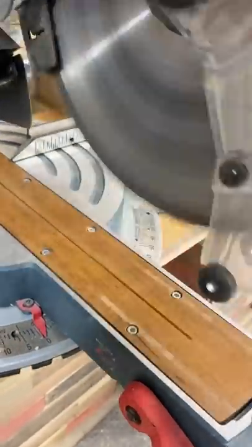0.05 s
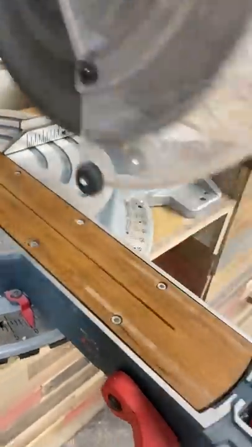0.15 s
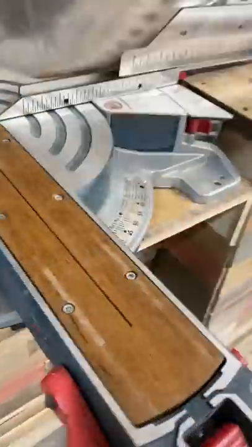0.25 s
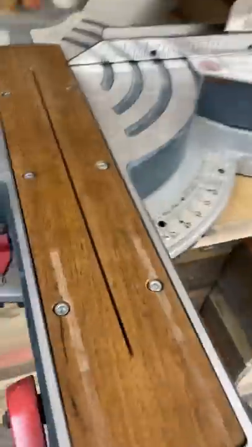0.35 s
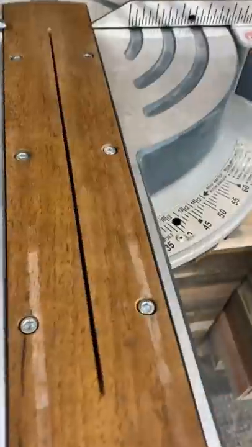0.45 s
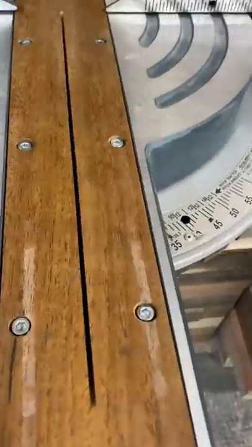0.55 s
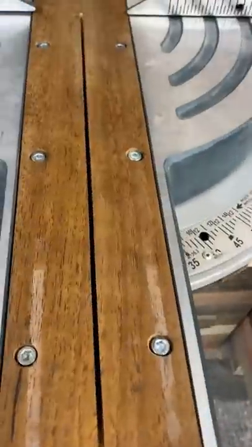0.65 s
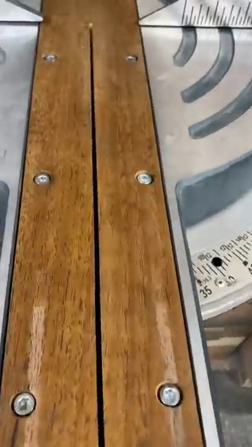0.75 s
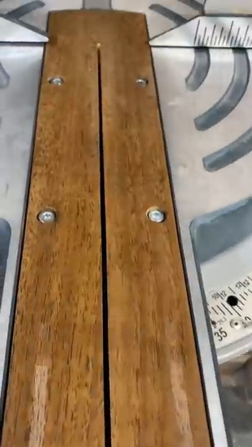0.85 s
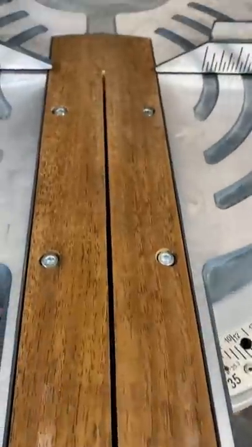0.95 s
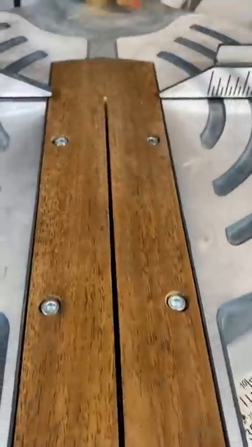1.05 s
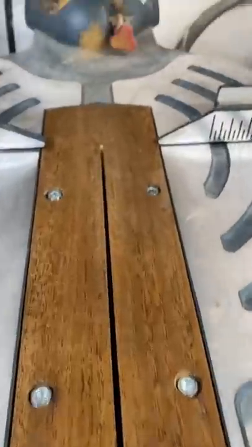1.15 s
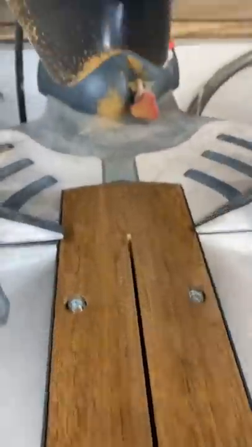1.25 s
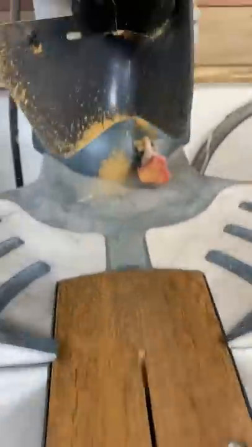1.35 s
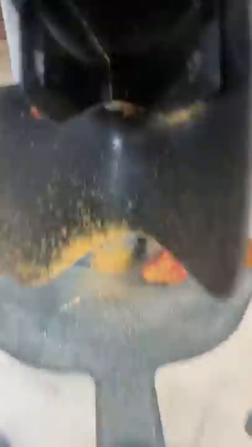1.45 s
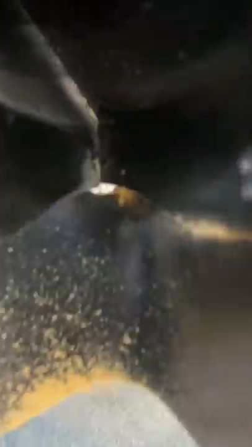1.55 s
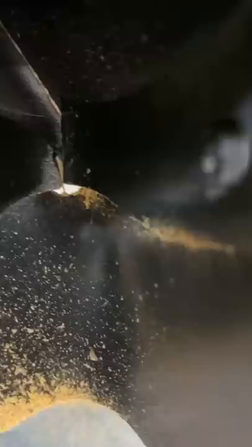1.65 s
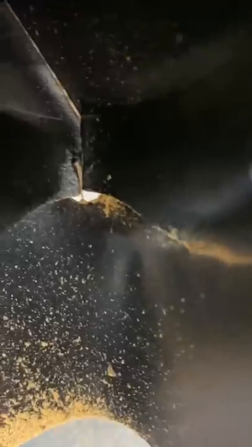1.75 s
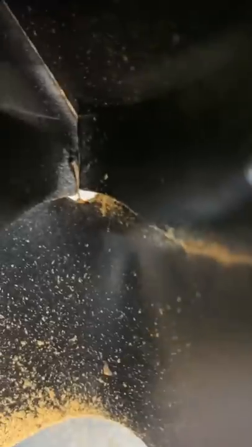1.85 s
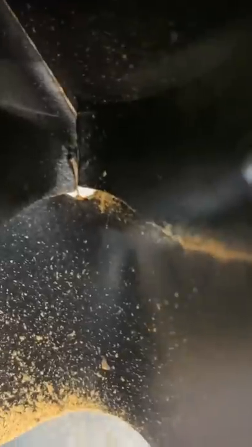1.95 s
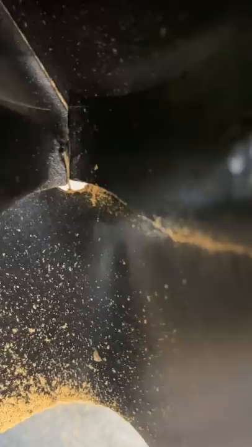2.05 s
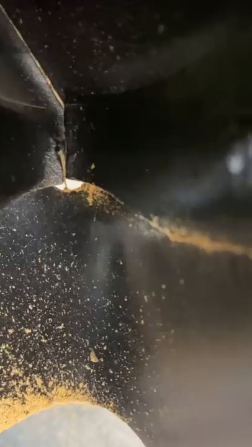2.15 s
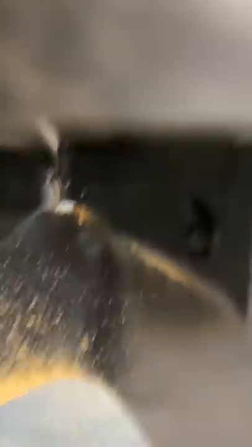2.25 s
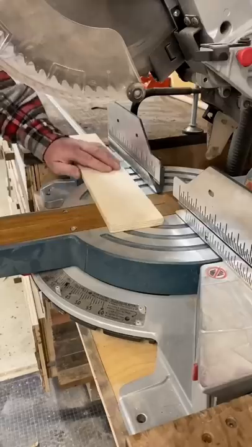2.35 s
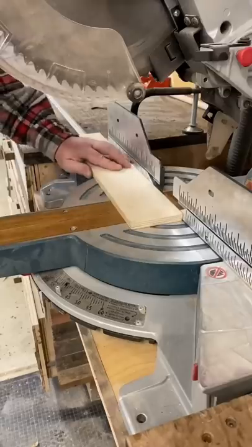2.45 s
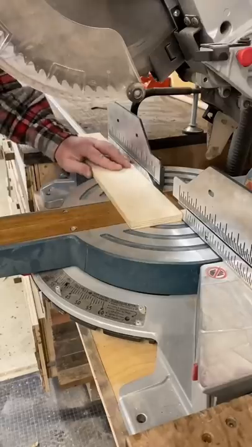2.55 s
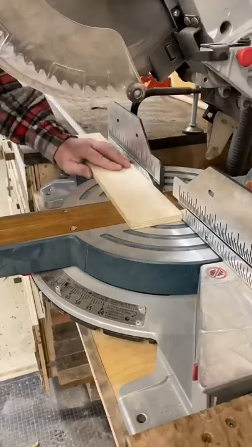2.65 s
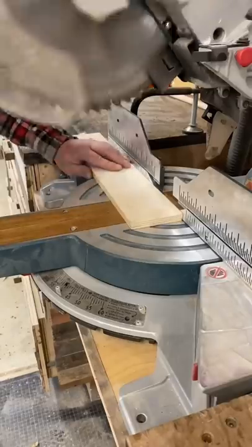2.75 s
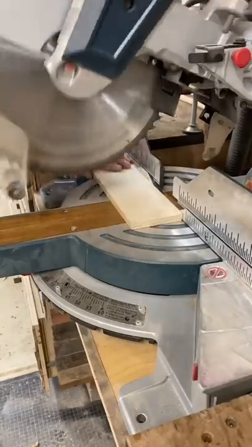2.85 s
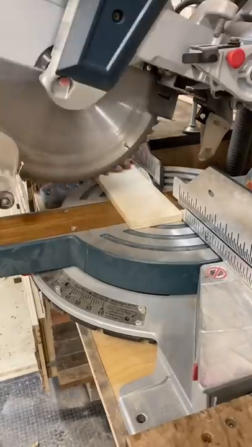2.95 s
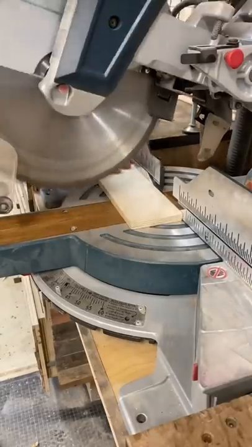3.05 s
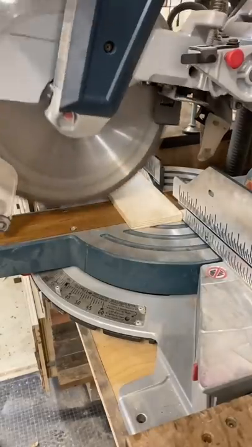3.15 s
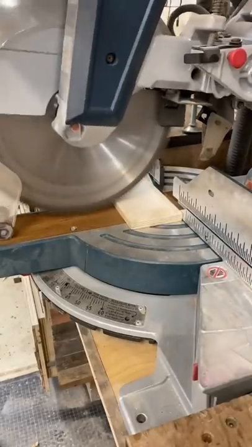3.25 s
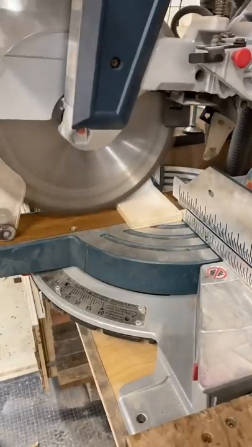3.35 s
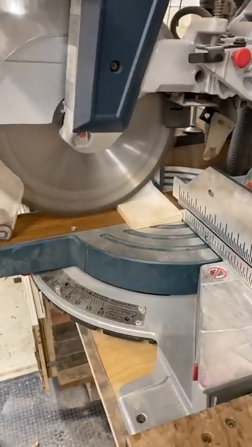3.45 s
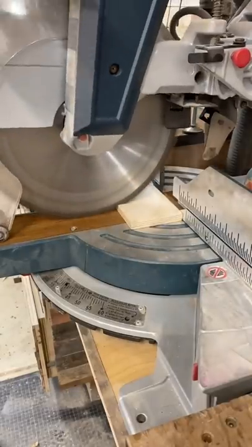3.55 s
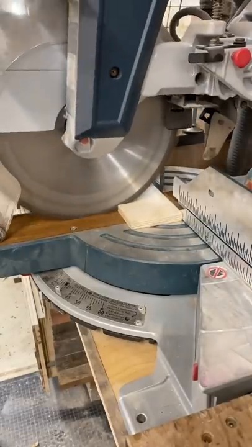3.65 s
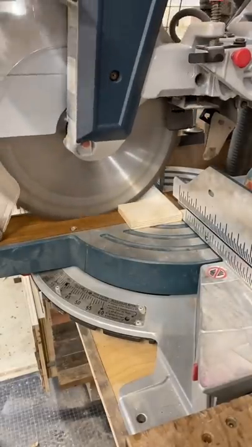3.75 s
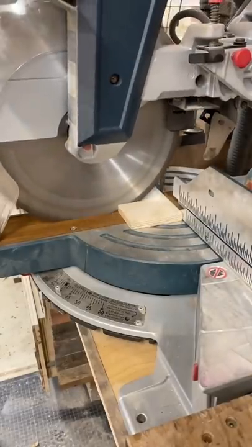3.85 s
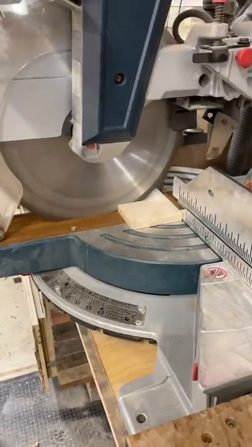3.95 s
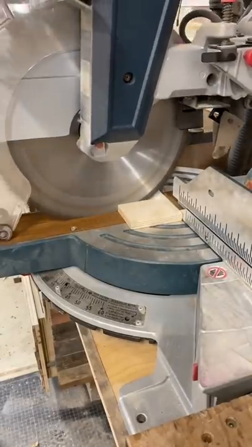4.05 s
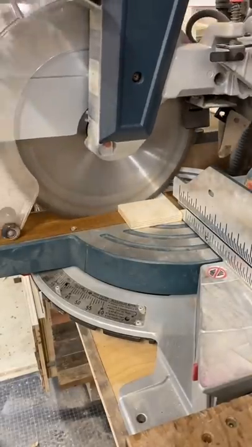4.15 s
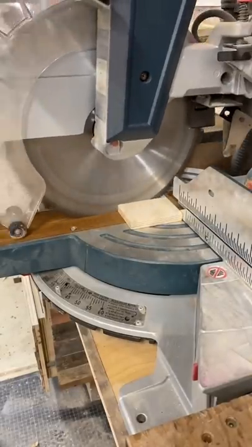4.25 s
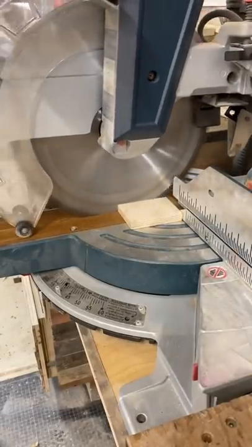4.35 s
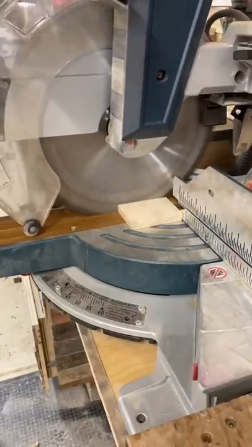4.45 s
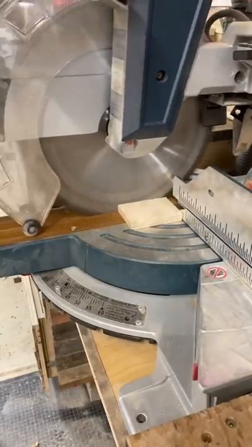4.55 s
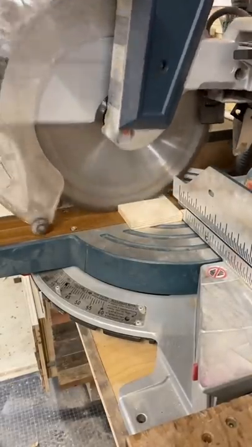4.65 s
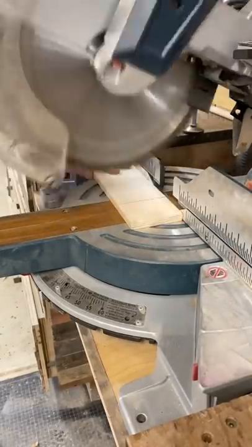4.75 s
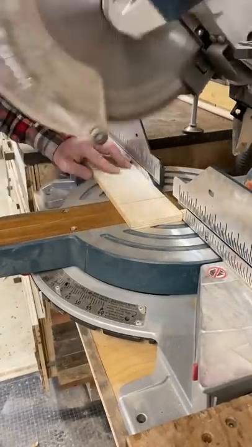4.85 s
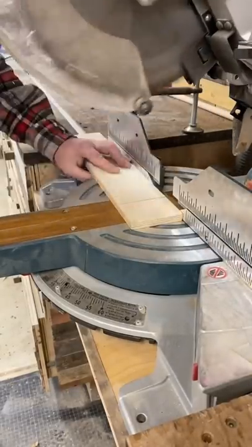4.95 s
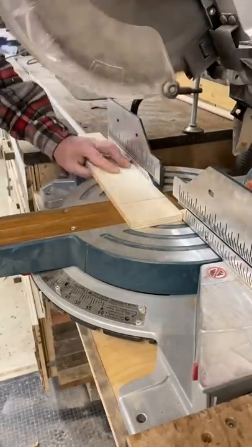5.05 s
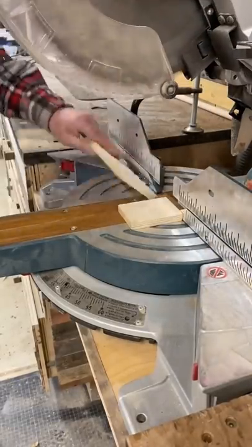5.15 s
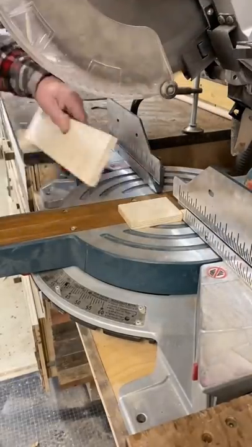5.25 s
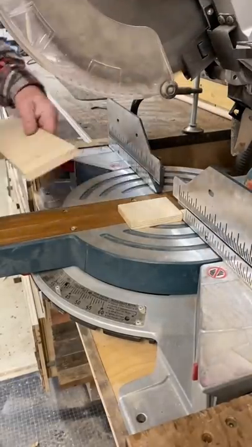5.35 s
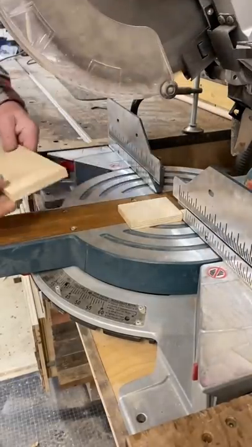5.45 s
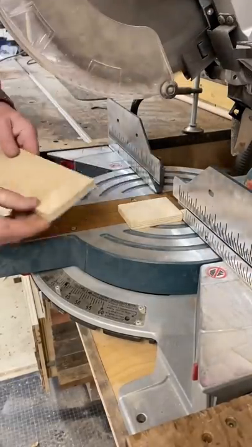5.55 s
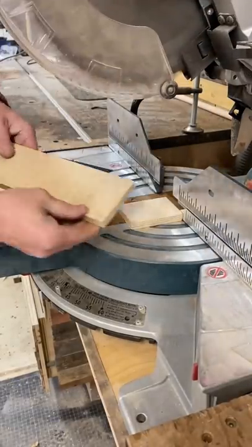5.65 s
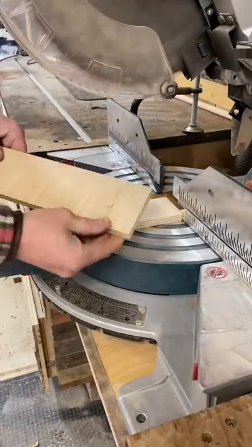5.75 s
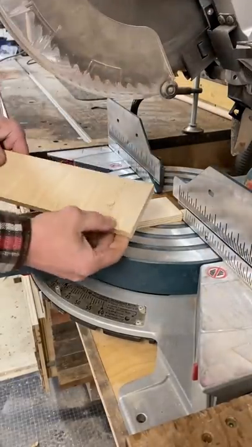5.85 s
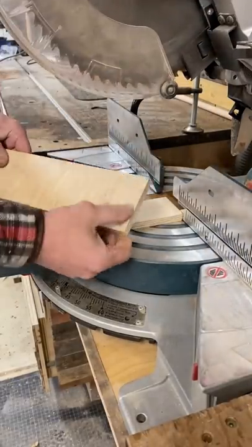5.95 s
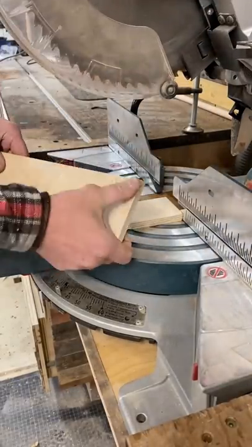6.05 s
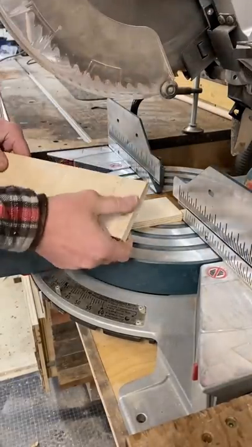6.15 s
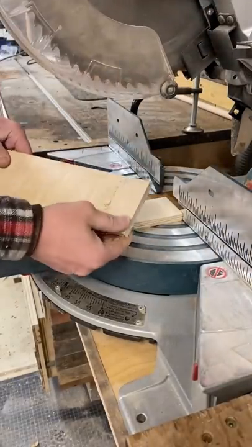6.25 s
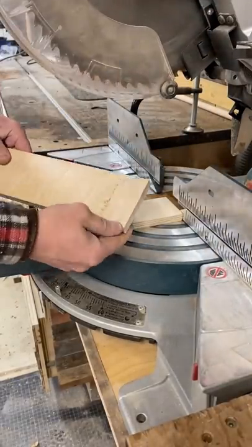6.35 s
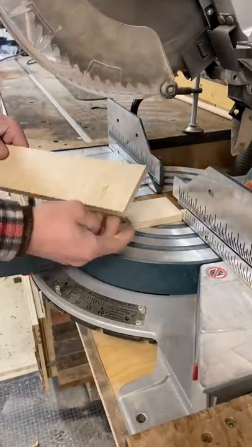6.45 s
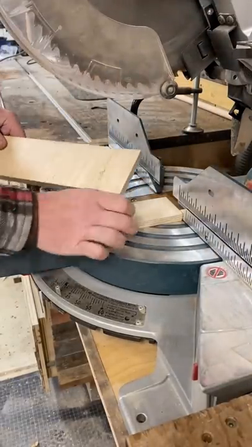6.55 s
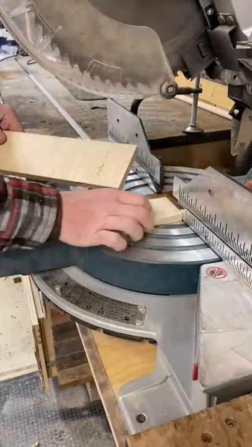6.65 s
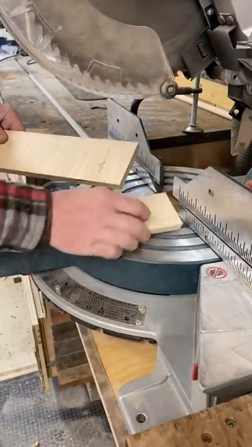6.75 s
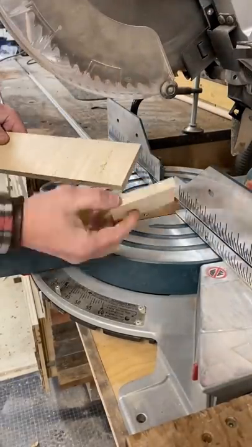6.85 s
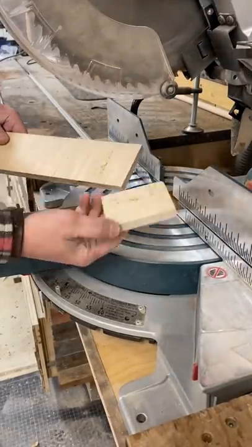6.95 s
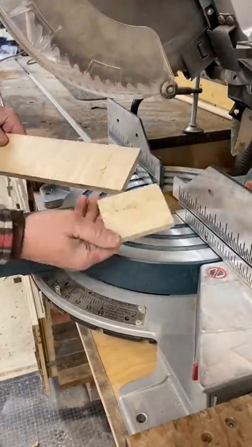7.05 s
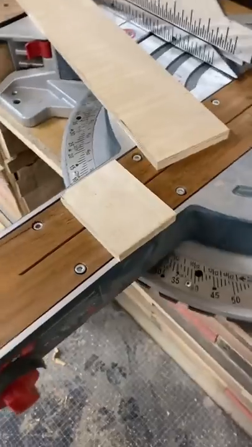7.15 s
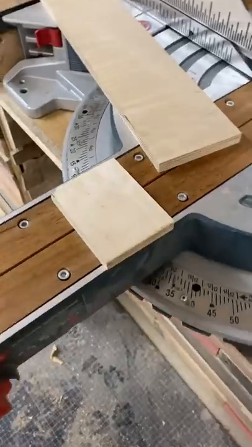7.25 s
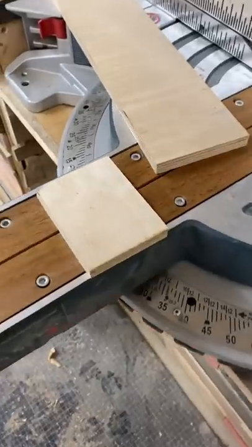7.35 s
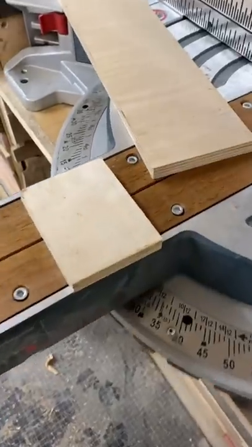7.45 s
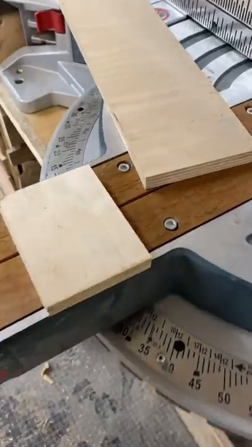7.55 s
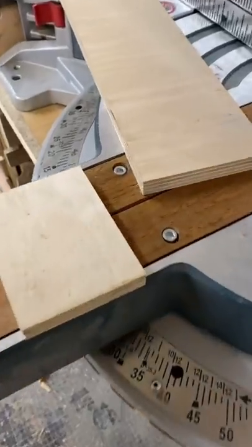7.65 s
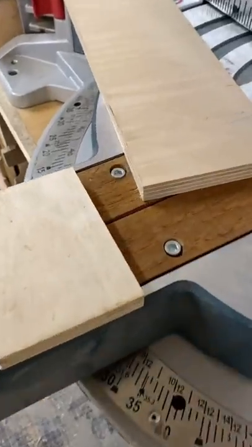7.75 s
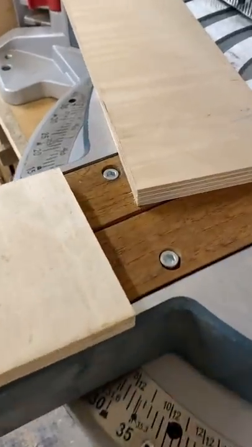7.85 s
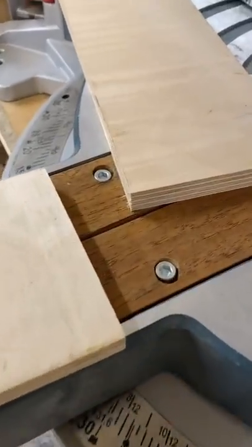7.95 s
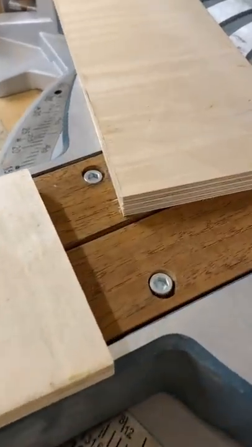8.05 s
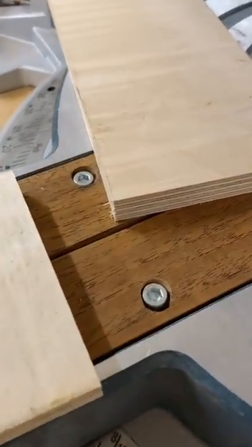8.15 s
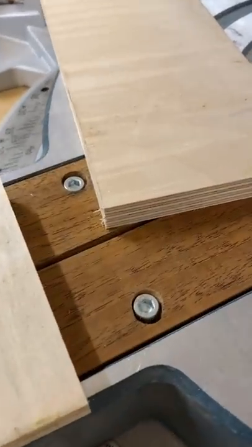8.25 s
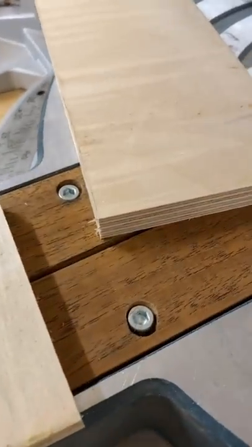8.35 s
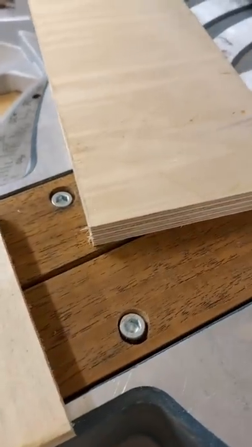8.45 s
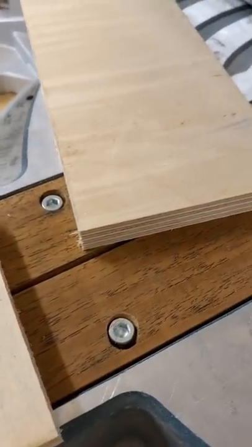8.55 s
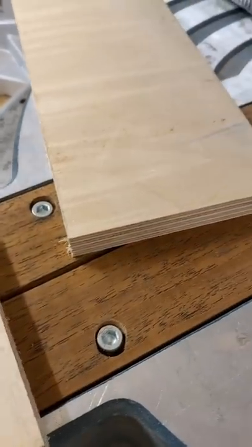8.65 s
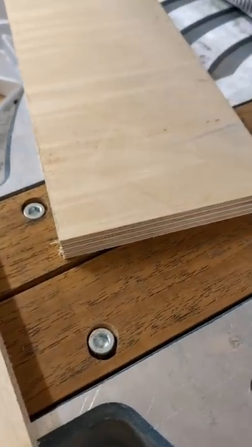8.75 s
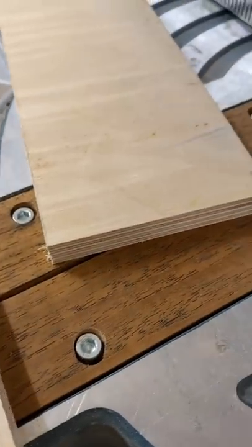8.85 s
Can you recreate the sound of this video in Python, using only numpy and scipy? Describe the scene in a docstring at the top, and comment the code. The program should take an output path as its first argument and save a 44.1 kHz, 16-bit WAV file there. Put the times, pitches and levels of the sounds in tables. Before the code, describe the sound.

A miter saw slides down in slow motion, clunks, then starts up, cuts a board and brakes while a dust extractor keeps running.

```python
"""A miter saw in a small workshop, close to a stereo microphone, in three abruptly joined moments.
First air rushes past and a motor's tones slide down, as in slow motion, through the housing's resonances.
At 2.2 s a part slams home and the blade guard rattles. At 2.85 s saw and dust extractor start:
gears whine, teeth tear through a board, and from 4.6 s the saw brakes while the extractor runs on.
From 7 s there is only the quiet shop: a low rumble, soft rustles of handling and a faint hum."""
import sys
import numpy as np
from scipy import signal
from scipy.fft import rfft, irfft, next_fast_len
from scipy.io import wavfile

SR = 44100
rng = np.random.default_rng(int(sys.argv[2]) if len(sys.argv) > 2 else 0)


def output_pcm(signal):
    """Save a mono or channel-first signal as 16-bit PCM at the path in sys.argv[1].

    Samples are clipped to [-1, 1] before scaling.
    """
    pcm = np.clip(np.atleast_2d(signal).T, -1, 1) * 32767
    wavfile.write(sys.argv[1], SR, np.round(pcm).astype(np.int16))


N = 392931
T = np.arange(N) / SR
HZ = np.fft.rfftfreq(N, 1 / SR)
SAW_MOMENT_S, QUIET_MOMENT_S = 2.228, 6.979
START_S, TRIGGER_S, BRAKE_S = 2.8324, 2.8505, 4.566  # the saw's run-up, switch and brake


def amp(db):
    """Decibels to gain."""
    return 10 ** (np.asarray(db) / 20)


def unit(x):
    """Scales to rms 1."""
    return x / np.sqrt(np.mean(x ** 2) + 1e-20)


def db_at(colour, hz):
    """The level of a spectrum at any frequency, joined on a log axis."""
    f, db = np.transpose(colour)
    return np.interp(np.log(hz + 1), np.log(f + 1), db)


def since(s):
    """Seconds gone by since s, zero before it."""
    return np.maximum(T - s, 0)


def swell(s, db, rise, fall):
    """A rounded swell that peaks at s, with exponential flanks (rise and fall in seconds)."""
    distance = np.where(T < s, (s - T) / rise, (T - s) / fall)
    return amp(db) / np.cosh(np.minimum(distance, 20))


def impact(s, t60, rise=.0004):
    """The envelope of one blow: a fast rise, then 60 dB down in t60 seconds."""
    return (1 - np.exp(-since(s) / rise)) * amp(-60 * np.minimum(since(s) / t60, 4))


def gate(start, end):
    """Open from start to end, with 4 ms edges."""
    return np.clip((T - start) / .004, 0, 1) * np.clip((end - T) / .004, 0, 1)


def drift(hz):
    """A random wander of rms 1, up to the given rate."""
    size = next_fast_len(N // 20)
    rate = np.fft.rfftfreq(size, N / SR / size)
    slow = irfft(rfft(rng.standard_normal(size)) / (1 + (rate / hz) ** 4), size)
    return unit(np.interp(T, np.linspace(0, T[-1], size), slow))


def resonance(hz, width_hz):
    """A peak of height 1 in the spectrum."""
    return 1 / (1 + (2 * (HZ - hz) / width_hz) ** 2)


def noise_spectrum(colour, resonances=()):
    """The spectrum of noise with a broad colour and resonant peaks."""
    db = db_at(colour, HZ) + sum(peak_db * resonance(hz, width) for hz, width, peak_db in resonances)
    return rfft(rng.standard_normal(N)) * amp(db)


def noise(colour, resonances=()):
    """Coloured noise of rms 1."""
    return unit(irfft(noise_spectrum(colour, resonances), N))


def body_and_hiss(colour, resonances=()):
    """Turbulence parted at 3.5 kHz into a body and a hiss, each of rms 1."""
    spectrum = noise_spectrum(colour, resonances)
    low = 1 / (1 + (HZ / 3500) ** 8)
    return unit(irfft(spectrum * low, N)), unit(irfft(spectrum * (1 - low), N))


def tone(hz):
    """A sine of rms 1 that follows a pitch curve, silent above hearing."""
    cycles = np.cumsum(hz * np.ones(N)) / SR + rng.random()
    return np.sqrt(2) * np.sin(2 * np.pi * cycles) * (hz < SR * .4)


def whistle(hz, width_hz):
    """A narrow band of noise, of rms 1, that follows a pitch curve."""
    phase = 2 * np.pi * np.cumsum(hz * np.ones(N)) / SR
    return drift(width_hz / 2) * np.cos(phase) + drift(width_hz / 2) * np.sin(phase)


def mode(hz, width_hz):
    """A resonance kept ringing by noise, of rms 1."""
    return unit(irfft(rfft(rng.standard_normal(N)) * resonance(hz, width_hz), N))


def reflections(t60, size=6000):
    """Spectrum of a dense train of dying reflections, of energy 1."""
    taps = rng.standard_normal(size) * amp(-60 * np.arange(size) / SR / t60)
    return rfft(taps / np.linalg.norm(taps), N)


def near_bench(x, wet, t60):
    """Reflections off the saw and the bench smear each glide, so it swells and fades as it slides."""
    return irfft(rfft(x) * (np.sqrt(1 - wet) + np.sqrt(wet) * reflections(t60)), N)


def slowdown(from_s=1.35, slide_s=.641, early_steepness=1.024):
    """Share of full speed: steady, then the pitch slides down, fast and then gently, as in slow motion."""
    left = np.exp(-since(from_s) / slide_s)
    return left / (1 + early_steepness * (1 - left))


# Colour of the rushing air: f/Hz, level/dB
DRAUGHT_COLOUR = [(53, -89), (90, -49), (169, -25), (260, -7), (544, 1.5), (821, -0.5), (896, -3.5),
                  (998, 2), (1290, -7), (1380, -4), (1640, -5), (2430, -7), (3740, -13), (7330, -10),
                  (16000, -20)]
# Duct resonances: f/Hz, width/Hz, level/dB
DUCT_RESONANCES = [(496, 87, 6.9), (1012, 25, 8.1), (2440, 76, 7.4), (2880, 96, 2)]


def draught(jet_s=1.42, jet_width_s=.12, approach_db_per_s=6, gust_db=.5):
    """Air nears the microphone, peaks as the dust chute's jet sweeps past and dies with the motor."""
    share = slowdown()
    jet = np.exp(-((T - jet_s) / jet_width_s) ** 2)
    distance_db = -approach_db_per_s * np.maximum(jet_s - T, 0)
    body_gain = amp(-40 + distance_db + 5.5 * jet) * share ** 1.6
    hiss_gain = amp(-47.5 + distance_db + 9.5 * jet) * share ** 2
    spray = swell(0, db=-45, rise=.05, fall=.05) + amp(-78)  # dies to a faint steady hiss
    body, hiss = body_and_hiss(DRAUGHT_COLOUR, DUCT_RESONANCES)
    return (body * body_gain + hiss * np.hypot(hiss_gain, spray)) * amp(gust_db * drift(25))


# Partials of the motor's note: multiple of the speed, level/dB
MOTOR_PARTIALS = [(1, 0), (2, -5)]
# Gear tones that come out as it slows: multiple of the speed, level/dB
SLOWING_GEARS = [(3, -5), (4, -1), (8, -5), (14.7, -8), (21.3, 1), (41, -3), (46, -2)]
# The housing both sound through: f/Hz, level/dB
MOTOR_HOUSING = [(200, -27), (340, -16), (440, 1), (520, 2.5), (565, -12), (660, -10), (800, -4),
                 (1000, -5), (1200, -11), (1430, -6), (1700, -10), (1950, -6), (2400, -12), (3000, -22),
                 (4500, -15), (7000, -16), (9000, -19), (11000, -24), (14000, -19), (16000, -40)]
# Hoots as the note slides through resonances: t/s, boost/dB, width/s
HOOTS = [(1.44, 13, 0.04), (1.83, 10, 0.081), (2.1, 17, 0.033)]
# The machine rings while it turns: f/Hz, width/Hz, level/dB at full speed, exponent of speed
MACHINE_RING = [(2153, 60, -61, .8), (2422, 50, -58, 1.5), (2660, 70, -63, .9), (2920, 80, -60, 1.8),
                (4190, 90, -74, .1)]


def slowing_motor(turns_per_s=1427, level_db=-45.5, waver=.00286, flutter=.069, gear_flutter=.45):
    """A motor holds its note, then slides down as in slow motion; gear tones come out as it sinks."""
    share = slowdown()
    speed = turns_per_s * share * (1 + waver * drift(40.5))
    gear_speed = speed * (1 + .012 * drift(90))
    hoots_db = sum(db * np.exp(-((T - s) / width) ** 2) for s, db, width in HOOTS)
    note = gears = 0
    for k, db in MOTOR_PARTIALS:
        gain = amp(db + hoots_db + db_at(MOTOR_HOUSING, k * speed))
        note += gain * tone(k * speed) * (1 + flutter * drift(36))
    for k, db in SLOWING_GEARS:
        gain = amp(db + db_at(MOTOR_HOUSING, k * speed))
        gears += gain * tone(k * gear_speed) * (1 + gear_flutter * drift(40))
    gears = (1 - share) * near_bench(gears, wet=.25, t60=.12)
    ring = sum(amp(db) * whistle(hz, width) * share ** power for hz, width, db, power in MACHINE_RING)
    return amp(level_db) * share * (note + gears) + ring


def squeal(start_hz=7000, sag_s=.16, waver=.029):
    """A brief squeal that falls in pitch."""
    hz = start_hz * np.exp(-T / sag_s) * (1 + waver * drift(200))
    return tone(hz) * swell(.025, db=-49, rise=.06, fall=.03)


# Wind on the microphone: f/Hz, level/dB
BUFFET_COLOUR = [(60, -50), (130, -27), (250, 7), (340, 3), (600, -27), (2000, -70)]


def buffet():
    """The jet buffets the microphone as it passes."""
    return noise(BUFFET_COLOUR) * swell(1.56, db=-56, rise=.06, fall=.1)


# Colour of the knock: f/Hz, level/dB
KNOCK_COLOUR = [(60, -60), (140, -28), (250, 0), (450, 7), (900, -6), (2500, -20), (4500, -42),
                (16000, -60)]


def knock(level_db=-39):
    """A dull knock as the motor slows."""
    return noise(KNOCK_COLOUR) * amp(level_db) * impact(2.153, t60=.06, rise=.0015)


# The clunk's bright crack: f/Hz, level/dB
CRACK_COLOUR = [(120, -32), (200, -16.5), (806, -18.5), (1140, -2.5), (2290, 5), (3020, -8.5), (3620, 3.5),
                (6400, -17), (8270, -8), (9230, -30), (9750, -11), (12200, -11), (16000, -18.5)]
# Its duller after-ring: f/Hz, level/dB
THUD_COLOUR = [(59, -49), (100, -31.5), (224, 4.5), (433, -17.5), (621, 8.5), (1010, -10), (1480, 1),
               (2270, -20), (3540, -12.5), (4870, -16), (7450, -17), (14700, -40.5), (16000, -43.5)]


def clunk(slam_s=2.2812, bounce_s=2.2862, level_db=-5.5):
    """Close by, a part slides home, slams and bounces once; the small room rings."""
    approach = np.exp(-abs(T - slam_s) / .026) * gate(SAW_MOMENT_S, slam_s)
    slide = noise(GUARD_COLOUR) * amp(-34) * approach
    crack = noise(CRACK_COLOUR) * (impact(slam_s, t60=.025) + amp(-6) * impact(bounce_s, t60=.0125))
    thud = noise(THUD_COLOUR) * amp(-3) * impact(slam_s + .0027, t60=.044, rise=.0026)
    room = noise(THUD_COLOUR) + .57 * noise(CRACK_COLOUR)
    room *= amp(-20) * impact(slam_s, t60=.28, rise=.005)
    return amp(level_db) * (slide + crack + thud + room)


# Moves of the saw arm: t/s, level/dB, rise/s, fall/s
ARM_MOVES = [(2.31, -44.5, 0.046, 0.069), (2.71, -40, 0.06, 0.028), (2.92, -47, 0.036, 0.13)]
# Their rumble: f/Hz, level/dB
ARM_COLOUR = [(15, -66.5), (25, -39), (75, -0.5), (108, -6.5), (277, -1.5), (317, -11.5), (382, -7),
              (600, -21.5), (780, -48.5), (1320, -120)]


def saw_arm():
    """The arm rumbles each time it is moved."""
    return noise(ARM_COLOUR) * sum(swell(*move) for move in ARM_MOVES)


# Clacks of the blade guard: t/s, level/dB, t60/s
CLACKS = [(2.556, -45.5, .072), (2.571, -40, 0.048), (2.612, -31, 0.11), (2.642, -23.5, 0.048),
          (2.65, -25.5, 0.053), (2.67, -36, 0.15), (2.691, -28, 0.068), (2.72, -39.5, .06),
          (2.75, -43.5, 0.076), (2.765, -38.5, 0.089), (2.787, -37, 0.066), (2.82, -42.5, 0.16),
          (2.852, -23, 0.063)]
# Colour of the guard: f/Hz, level/dB
GUARD_COLOUR = [(240, -38), (400, -11), (676, -15), (893, -6), (964, -10.5), (1580, -7), (1900, -12),
                (2930, -6.5), (3690, -12.5), (16000, -33)]
# Its resonances: f/Hz, width/Hz, level/dB
GUARD_RESONANCES = [(900, 320, 11), (1210, 220, 8), (3000, 120, 3.8)]


def blade_guard(room_db=-17, floor_db=-61):
    """The guard clacks open, each clack with a tail of room; the last is the motor's kick."""
    energy = amp(floor_db) ** 2
    for s, db, t60 in CLACKS:
        direct = impact(s, t60, rise=.0016)
        room = amp(room_db) * impact(s, t60=.27, rise=.0046)
        energy += amp(db) ** 2 * (direct ** 2 + room ** 2)
    return noise(GUARD_COLOUR, GUARD_RESONANCES) * np.sqrt(energy)


def trigger(level_db=-24.5):
    """The saw's switch snaps shut."""
    return noise(CRACK_COLOUR) * amp(level_db) * impact(TRIGGER_S, t60=.021)


# Current drawn by the saw's motor: t/s, level/dB
CURRENT = [(2.866, -9.5), (2.93, -7.5), (3.0, 2), (3.1, -8.5), (3.16, -5.5), (3.19, -16), (3.6, -31.5),
           (4.5, -40.5)]


def current(rise_s=.006, fall_s=.069):
    """The current as a gain: it surges at the trigger and dies away at the brake."""
    switched = (1 - np.exp(-since(TRIGGER_S) / rise_s)) * np.exp(-since(BRAKE_S) / fall_s)
    return amp(np.interp(T, *np.transpose(CURRENT))) * switched


# Partials of the magnetic hum: f/Hz, level/dB
HUM_PARTIALS = [(241, -3.5), (482, -14.5), (723, -18.5), (975, -14)]


def magnetic_hum(level_db=-20, waver=.011, flutter=.34):
    """The motor hums while its current is high."""
    hum = sum(amp(db) * tone(hz * (1 + waver * drift(38))) * (1 + flutter * drift(25))
              for hz, db in HUM_PARTIALS)
    return amp(level_db) * hum * current()


SAW_TURNS_PER_S = 392


def saw_speed(run_up_s=.152, braking_s=.29, friction_turns_per_s=12):
    """Share of full speed: an exponential run-up, then brake and dry friction stop the armature."""
    run_up = 1 - np.exp(-since(START_S) / run_up_s)
    friction = friction_turns_per_s / SAW_TURNS_PER_S
    braked = np.maximum((1 + friction) * np.exp(-since(BRAKE_S) / braking_s) - friction, 0)
    return run_up * braked * gate(TRIGGER_S, T[-1])


# Gear tones: multiple of the speed, level/dB starting, level/dB running, level/dB braking
GEAR_TONES = [(8, -14, -13, -24), (10.8, 0, -30, -30), (14.65, -14, -9, -24), (16, -2, -5, 0),
              (17, -5, -14, -18), (21.4, -4, -12, -22), (23.5, -14, -14, -8), (31.7, -2, -2, -8),
              (37.8, -9, -25, -20), (40.1, -14, -9, -12), (43, -9, -30, -16)]
# The housing they sound through: f/Hz, level/dB
SAW_HOUSING = [(500, -14), (1450, -2), (2000, -13), (2500, -7), (3000, 1), (3500, 0), (4200, -4), (5100, 0),
               (6300, 0), (7000, -5), (7600, -1), (9400, -7), (10300, 4), (11400, -2), (12400, 1),
               (16000, -3)]
# How the brake dulls them: f/Hz, level/dB
BRAKE_COLOUR = [(1400, 1), (2200, -3), (2700, 6), (4500, 3), (5500, -10), (16000, -14)]


def gear_whine(drive_db=-19.5, fade_db_per_s=16.5, brake_db=-41.5, rattle=.6):
    """The gears whine on multiples of the armature's speed, rising at the start, sinking as it brakes."""
    share = saw_speed()
    starting = np.interp(T, [3.12, 3.3], [1, 0])
    braking = np.clip(since(BRAKE_S) / .083, 0, 1)
    waver = .00112 + .008 * starting + .018 * braking
    speed = SAW_TURNS_PER_S * share * (1 + waver * drift(110))
    whine = 0
    for k, start_db, run_db, stop_db in GEAR_TONES:
        hz = k * speed
        db = run_db + (start_db - run_db) * starting + db_at(SAW_HOUSING, hz)
        db += (stop_db - run_db + db_at(BRAKE_COLOUR, hz)) * braking
        whine += amp(db) * tone(hz) * (1 + rattle * drift(70))
    driven = amp(drive_db - fade_db_per_s * since(START_S)) * share
    braked = amp(brake_db) * share ** .4 * np.interp(T, [4.93, 5.15], [1, 0])
    load = driven * (1 - braking) + braked * braking
    return near_bench(whine * load, wet=.35, t60=.11)


# Colour of fan roar and blade hiss: f/Hz, level/dB
BLADE_COLOUR = [(29, -66), (50, -35), (203, -15), (240, -11), (321, -14.5), (495, -16.5), (630, -18),
                (1150, -7.5), (1870, -19), (3410, -11.5), (4240, -4), (6240, -7), (9410, -9), (10600, -3.5),
                (16000, -9.5)]
# Resonances of the steel disc: f/Hz, width/Hz, level/dB
DISC_RESONANCES = [(1150, 200, 1), (2980, 33, 6), (3500, 300, 7.6), (4620, 86, 5), (5400, 22, 4.4),
                   (6650, 590, 3.3), (7136, 106, 4.4), (7880, 38.9, 6.4), (10750, 66, 4), (10800, 170, 1.7),
                   (11460, 101, 0.997), (13390, 60, 4)]
# Bite of the teeth, fed through the board and lifted clear: t/s, level/dB added to the hiss
BITE = [(3.1, -2.5), (3.28, 2), (3.33, -1.5), (3.52, 0.5), (3.68, -1), (3.77, 0.5), (3.9, -1), (4.15, 0.5),
        (4.42, 0), (4.54, -2), (4.6, -6)]


def blade(roar_db=-42.5, strain_db=-22.5, hiss_db=-28.5, surge_db=19, settle_s=.37, throb=.12):
    """The motor's fan roars; teeth tear through air and wood and ring the disc. Both throb with the mains."""
    share = saw_speed()
    roar, hiss = body_and_hiss(BLADE_COLOUR, DISC_RESONANCES)
    roar *= np.hypot(amp(roar_db) * share ** 2, amp(strain_db) * current() ** .47)
    _, shifted_hiss = body_and_hiss(BLADE_COLOUR, DISC_RESONANCES)
    shift = np.pi * T / .6  # the reflections change as the head sinks
    hiss = (near_bench(hiss, wet=.6, t60=.04) * np.cos(shift)
            + near_bench(shifted_hiss, wet=.6, t60=.04) * np.sin(shift))
    bite_db = np.interp(T, *np.transpose(BITE))
    surge = np.exp(-since(TRIGGER_S) / settle_s)
    hiss *= amp(hiss_db + bite_db + surge_db * surge) * share ** 1.4
    mains = np.cos(2 * np.pi * 120 * T)
    return (roar + hiss) * (1 + throb * np.sqrt(current()) * mains)


# Partials of the extractor's fan: multiple of the speed, level/dB
FAN_PARTIALS = [(1, -3), (2, -16), (3, -23.5), (4, -27.5)]
# Colour of the air it draws: f/Hz, level/dB
SUCTION_COLOUR = [(30, -45.5), (70, -27), (120, -12), (170, 1), (290, 0.5), (340, 0), (550, 1.5), (800, -5),
                  (1400, -4), (1850, -13.5), (2500, -8.5), (4700, -12.5), (8200, -18), (9300, -26.5),
                  (10500, -19.5), (15800, -18.5)]
# Hose resonances: f/Hz, width/Hz, level/dB
HOSE_RESONANCES = [(240, 14, 15.5), (286, 27, 11), (514.5, 69, 11.8), (862, 53, 4.7), (1216, 65, 8.1),
                   (1327, 39.4, 4.4), (1469, 67, 8.64), (3556, 58, 5.5), (4510, 228.6, 5.3),
                   (5700, 500, -3.5), (8000, 200, 4)]


def dust_extractor(turns_per_s=708, run_up_s=.195, sag=.015, fan_db=-38, suction_db=-37):
    """A fan note over air drawn through a hose, slightly flat under the saw's load;
    automatic gain, here a timed dip, turns it down while the saw is loud."""
    share = 1 - np.exp(-since(TRIGGER_S) / run_up_s)
    sawing = np.interp(T, [4.6, 4.9], [1, 0])
    speed = turns_per_s * share * (1 - sag * sawing) * (1 + .0011 * drift(11))
    note = sum(amp(db) * tone(k * speed) * (1 + .12 * drift(27)) for k, db in FAN_PARTIALS)
    suction = noise(SUCTION_COLOUR, HOSE_RESONANCES) * amp(suction_db - 5 * sawing + drift(10))
    return note * amp(fan_db - 4 * sawing) * share ** 6 + suction * share


# Whistles of the blade: t/s, level/dB, rise/s, fall/s, f/Hz, width/Hz, glide/(Hz per s)
BLADE_WHISTLES = [(3.22, -33, .03, .05, 5700, 50, 0), (3.5, -42, .12, .12, 7224, 25, 0),
                  (3.55, -37, .15, .2, 10950, 20, 0), (3.68, -36, .12, .13, 5776, 20, 0),
                  (3.8, -40, .06, .08, 6420, 90, 900), (3.95, -43, .15, .2, 4440, 35, 350),
                  (4.1, -41, .12, .13, 8990, 60, 200), (4.13, -40, .12, .06, 6215, 30, 100),
                  (4.3, -42, .07, .06, 7650, 70, 600), (4.32, -45, .12, .1, 13650, 120, 3500),
                  (4.42, -42, .15, .08, 1160, 90, 0), (4.66, -48, .04, .11, 6950, 90, -2500),
                  (4.76, -53, .06, .15, 7780, 80, -1700)]


def blade_whistles():
    """The blade whistles, holding or rising through the cut and sinking as it slows."""
    whistles = sum(whistle(hz + glide * (T - s), width) * swell(s, db, rise, fall)
                   for s, db, rise, fall, hz, width, glide in BLADE_WHISTLES)
    return whistles * np.clip(since(START_S + .2) / .15, 0, 1)


# Modes rung by the grazing teeth: f/Hz, level/dB
GRAZE_MODES = [(5798, -32), (6390, -27), (6977, -33.5), (7564, -32), (7865, -43), (8145, -34), (11057, -46),
               (12231, -49), (13948, -37)]
# Colour of their rasp: f/Hz, level/dB
RASP_COLOUR = [(2500, -32.5), (4500, -14), (6800, -4), (8800, -5.5), (11000, 4), (13800, -3.5),
               (16000, -14)]


def graze(grain_db=2):
    """The teeth graze the board as the blade lifts: a rasp and a short ring."""
    rasp = noise(RASP_COLOUR) * amp(grain_db * drift(500)) * swell(4.512, db=-31, rise=.016, fall=.02)
    ring = sum(amp(db) * whistle(hz, width_hz=30) for hz, db in GRAZE_MODES)
    return rasp + ring * swell(4.52, db=-2, rise=.028, fall=.045)


def table_bump():
    """A soft bump on the saw table as the offcut is picked up."""
    return noise(ARM_COLOUR) * swell(6.765, db=-52, rise=.006, fall=.012)


# Room tone of the workshop: f/Hz, level/dB
SHOP_COLOUR = [(15, -53), (25, -61), (70, -7), (161, -5), (185, -9.5), (242, -16), (840, -40), (1610, -39),
               (3160, -51.5), (5140, -52.5), (5570, -58), (16000, -60)]
# Rustles of handling: t/s, level/dB, rise/s, fall/s
RUSTLES = [(7.0, -65, 0.022, 0.026), (7.109, -72, .02, 0.0233), (7.22, -69, .025, 0.0117),
           (7.56, -78, 0.11, 0.09), (7.98, -67.5, 0.0516, 0.041)]
# Their colour: f/Hz, level/dB
RUSTLE_COLOUR = [(100, -14), (500, 12), (1500, -7.5), (3000, -10.5), (6500, -6), (9500, -14), (12500, -11),
                 (16000, -27)]


def quiet_shop(rumble_db=-60.5, hum_hz=301, whirr_hz=480):
    """Low room tone and a few soft rustles; a faint hum comes and goes with a whirr of air."""
    rumble = noise(SHOP_COLOUR) * amp(rumble_db + drift(17))
    rustle = noise(RUSTLE_COLOUR) * sum(swell(*row) for row in RUSTLES) * amp(2 * drift(60))
    hum = mode(hum_hz, width_hz=5.6) + amp(-9) * mode(whirr_hz, width_hz=400)
    return rumble + rustle + hum * swell(8.28, db=-64, rise=.13, fall=.3)


def microphone(x, width, balance, scatter, spread_s):
    """The two ports hear the sound out of step and with different reflections, mostly in the treble."""
    apart = 1j * np.sqrt(1 - scatter) + np.sqrt(scatter) * reflections(spread_s)
    mid = rfft(x)
    side = apart * amp(db_at(width, HZ))
    lean = amp(db_at(balance, HZ) / 2)
    return np.array([irfft(mid * (1 + side) * lean, N), irfft(mid * (1 - side) / lean, N)])


# Stereo width at the microphone in each moment: f/Hz, side minus mid level/dB
SLOWING_WIDTH = [(200, -31), (400, -50), (950, -17.5), (2400, 2.5), (6000, -1), (15000, -0.5)]
SAW_WIDTH = [(60, -25), (130, -35), (290, -39.5), (640, -19.5), (1410, -6.5), (3100, -19.5), (6820, -0.5),
             (15000, -5.5)]
SHOP_WIDTH = [(60, -33), (240, -17), (950, 3.5), (4000, 3.5), (15000, 1)]
# Lean at the microphone in each moment: f/Hz, left minus right level/dB
SLOWING_BALANCE = [(400, -1.1), (3000, -1)]
SAW_BALANCE = [(400, 0), (2400, -0.2), (5500, -2), (10000, -0.7)]
SHOP_BALANCE = [(200, 0), (3000, .3)]


def scene():
    """The three moments one after another, the machines close up and a little to the right."""
    slowing = draught() + slowing_motor() + squeal() + buffet() + knock()
    sawing = (clunk() + saw_arm() + blade_guard() + trigger() + magnetic_hum() + gear_whine()
              + blade() + dust_extractor() + blade_whistles() + graze() + table_bump())
    slowing = microphone(slowing, SLOWING_WIDTH, SLOWING_BALANCE, scatter=.97, spread_s=.095)
    sawing = microphone(sawing, SAW_WIDTH, SAW_BALANCE, scatter=.6, spread_s=.15)
    quiet = microphone(quiet_shop(), SHOP_WIDTH, SHOP_BALANCE, scatter=.65, spread_s=.06)
    return (slowing * gate(-1, SAW_MOMENT_S)
            + sawing * gate(SAW_MOMENT_S, QUIET_MOMENT_S)
            + quiet * gate(QUIET_MOMENT_S, T[-1]))


def record(dry):
    """The microphone's signal is clipped at full scale and low-passed at 15.9 kHz."""
    lowpass = signal.firwin(511, 15900, window=("kaiser", 9), fs=SR)
    return signal.oaconvolve(np.clip(dry, -1, 1), lowpass[None], "same", axes=1)


dry = scene()
out = record(dry)
output_pcm(out)
```